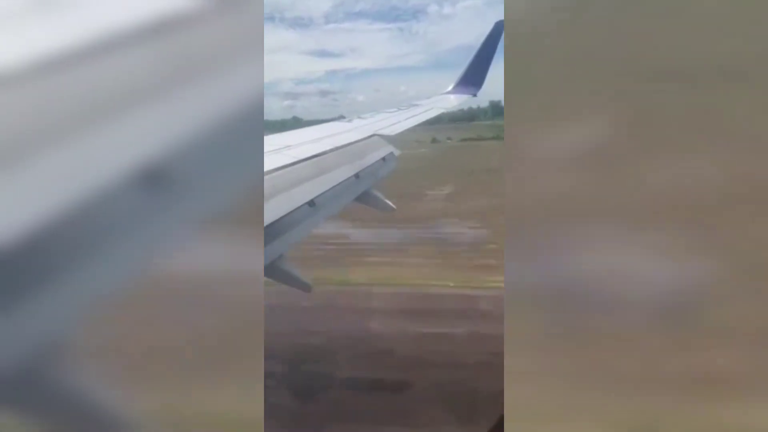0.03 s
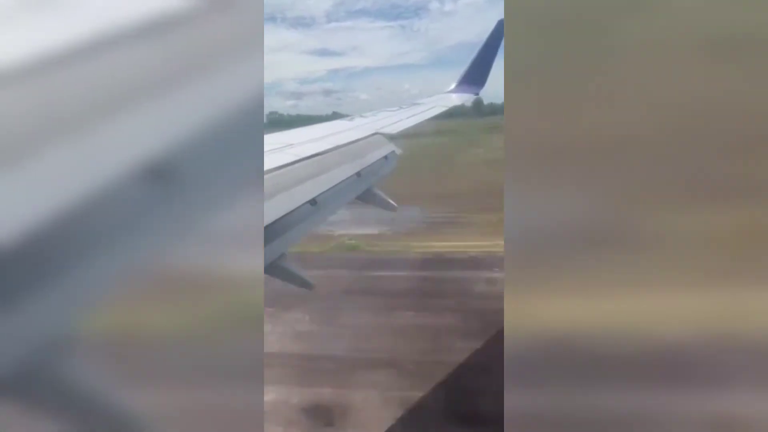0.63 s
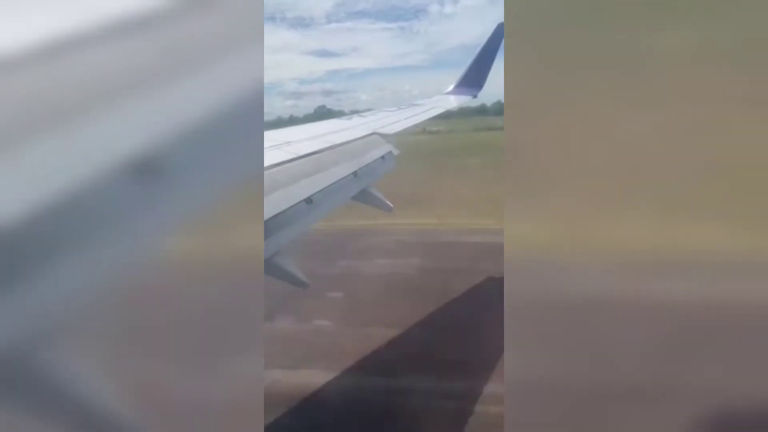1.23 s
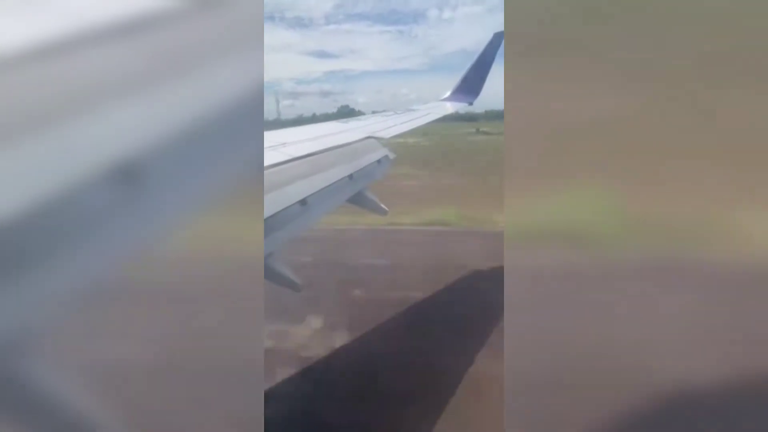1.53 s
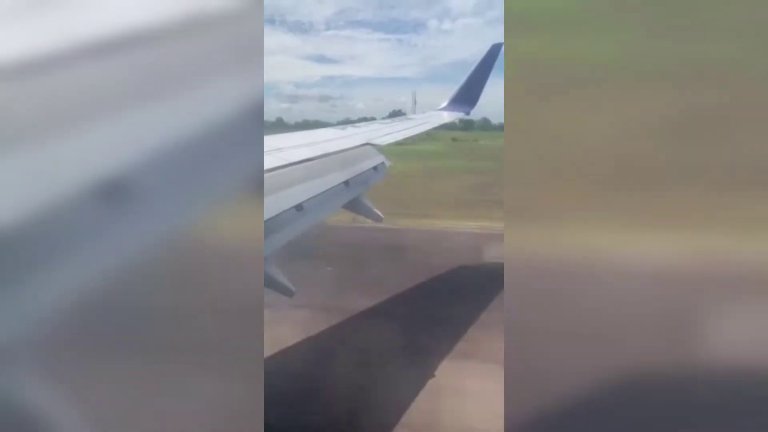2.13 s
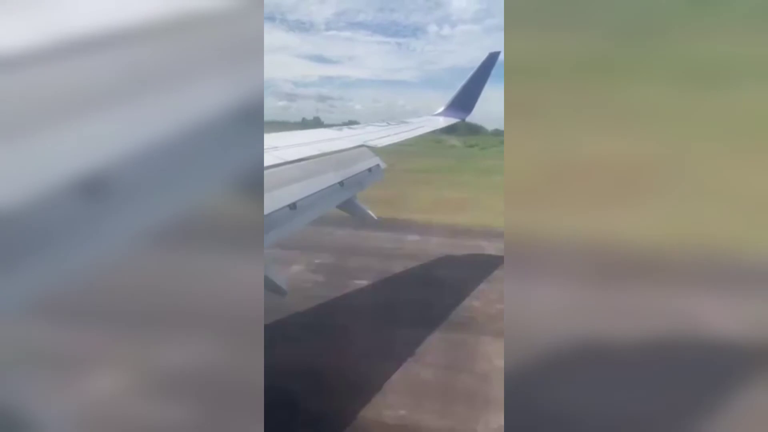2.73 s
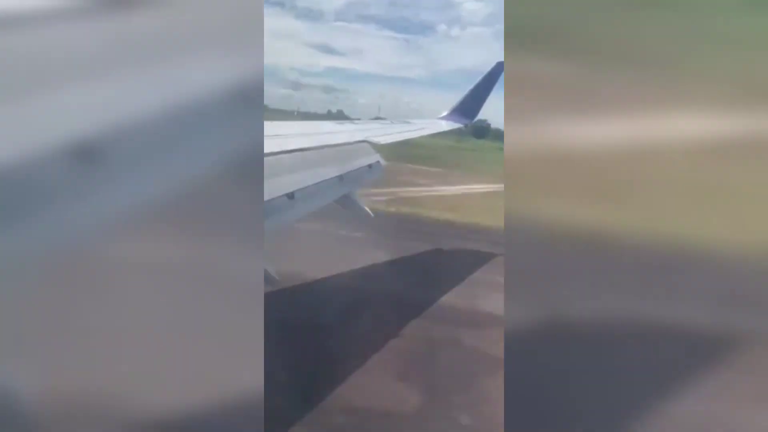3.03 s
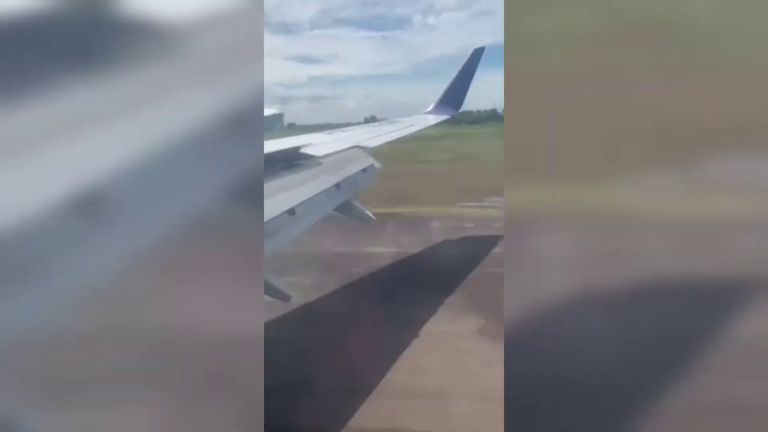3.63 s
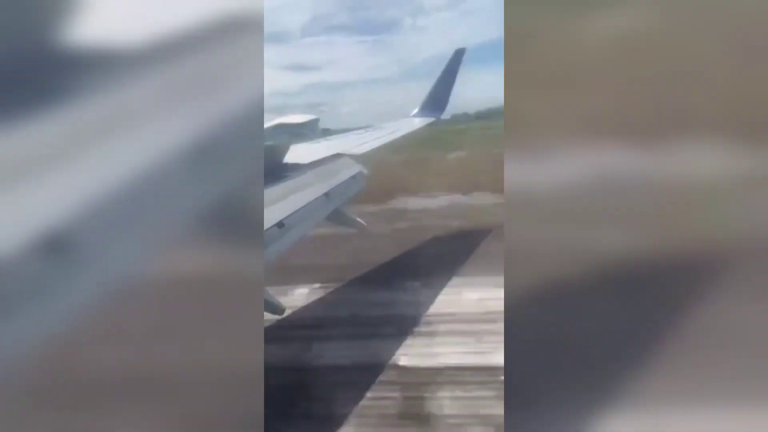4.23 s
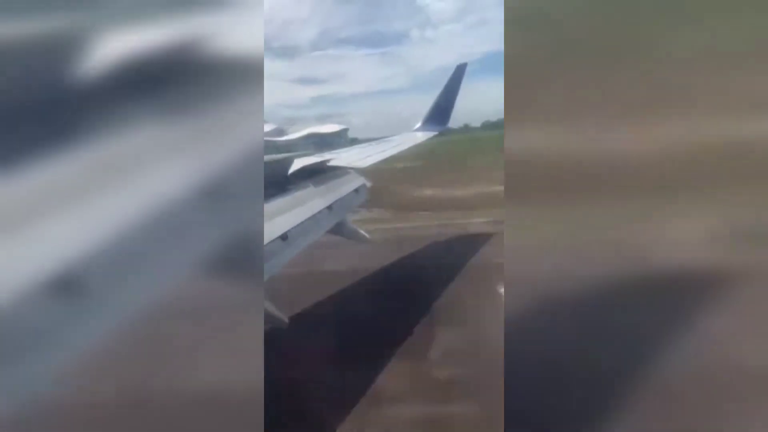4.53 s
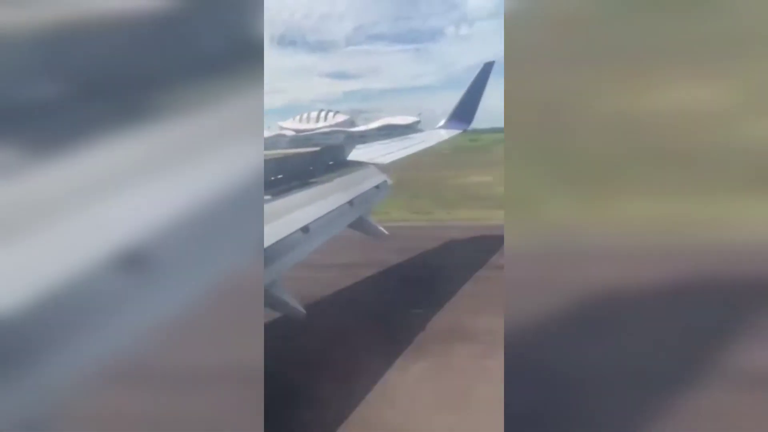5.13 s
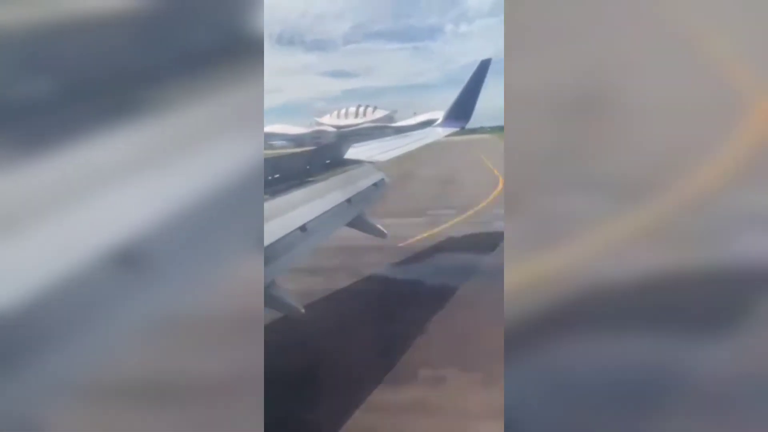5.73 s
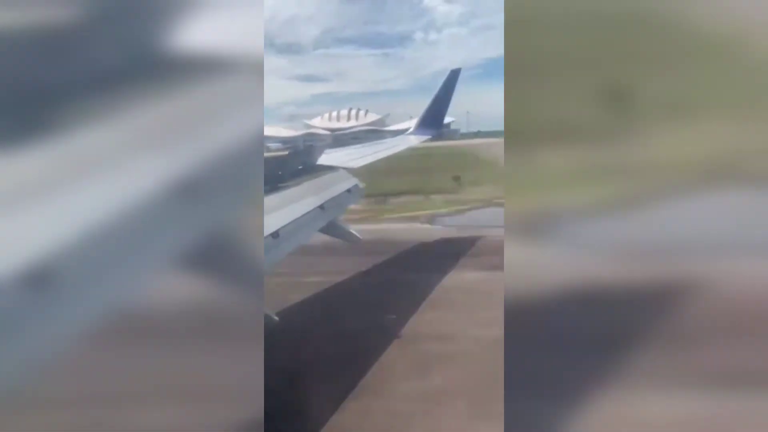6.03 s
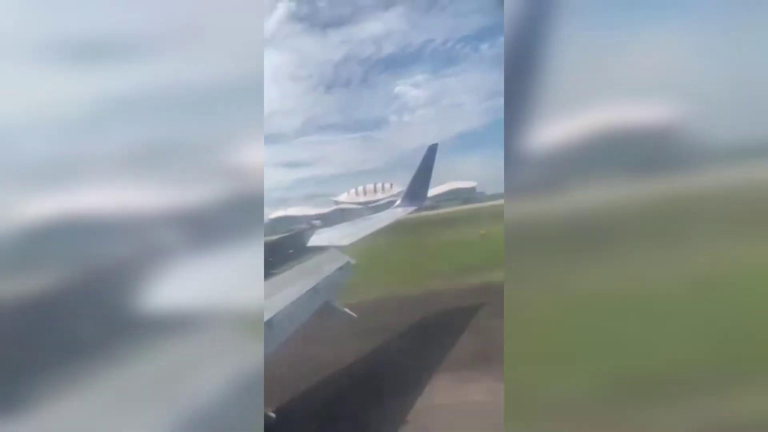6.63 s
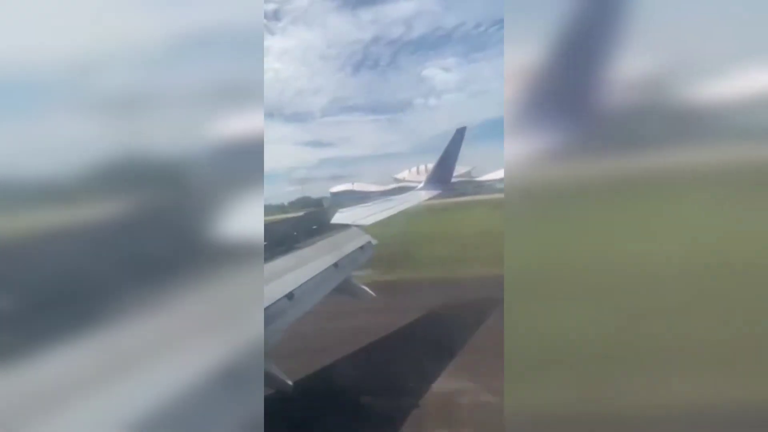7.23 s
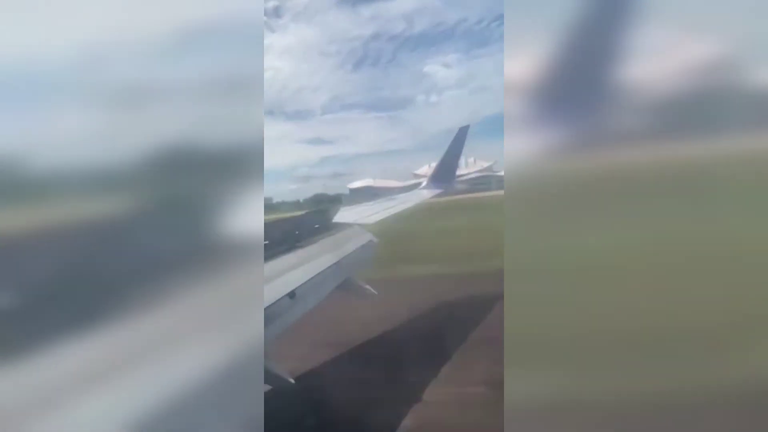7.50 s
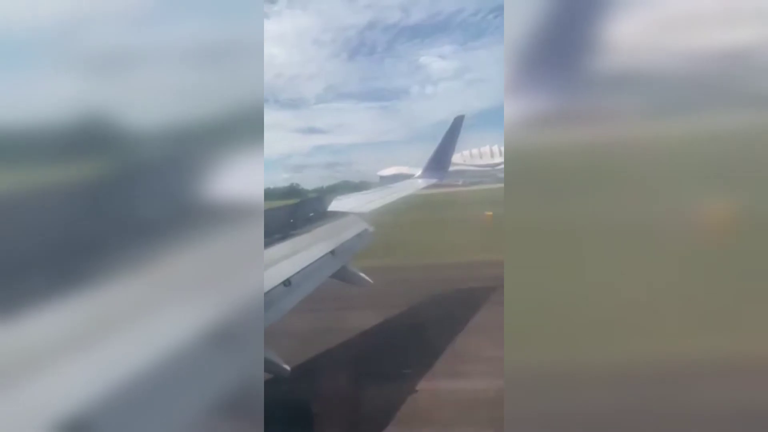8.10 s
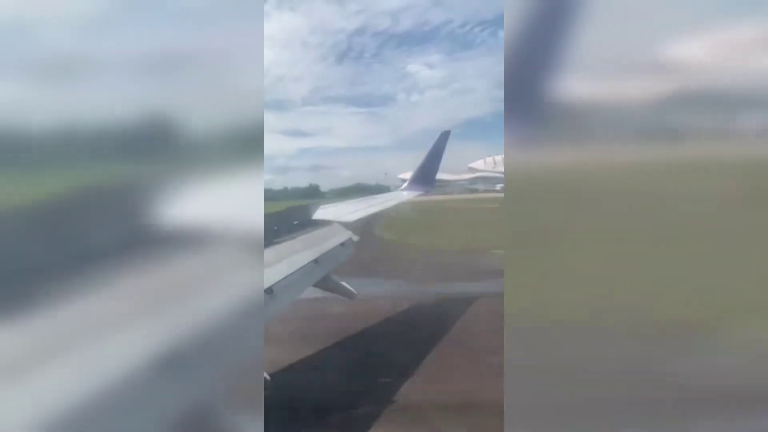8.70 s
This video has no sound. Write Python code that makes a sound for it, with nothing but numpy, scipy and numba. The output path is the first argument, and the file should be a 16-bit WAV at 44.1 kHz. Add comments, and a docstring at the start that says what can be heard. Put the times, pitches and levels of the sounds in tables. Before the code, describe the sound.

From an airliner's window seat, a deep roar of air and a low engine drone fill the cabin, with a soft hiss and a faint, wavering pump whine. Plastic trim snaps at about 1.6 seconds. At 2.8 seconds the wheels touch down with a clack, and the drone turns abruptly into a loud, booming runway rumble that lasts to the end. Wall panels, bins and trim rattle and clack in irregular jolts. A loose fitting knocks on the left near 3, 3.5, 4, 5.6 and 6.1 seconds, hardest at 3.5. Low hums swell briefly around 4.5 to 5.3 seconds, and a sharp plastic snap comes near 5.1. From 6.5 seconds a few thin squeaks appear and the engines build into a low rush of reverse thrust, strongest at the end near 9 seconds, while the rattle eases slightly. The phone holds down the loudest rumble.

```python
"""An airliner's body booms on the runway as it lands, heard from a window seat over the wing.
Before the wheels touch at 2.83 s, air roars past the wing, the engines drone and a pump whines.
Then the tyres pound the runway: wall panels, bins and plastic trim rattle, a loose fitting knocks,
and near the end the engines swell for reverse thrust. A phone's limiter holds down the loud rumble."""
import sys
import numpy as np
from scipy import signal
from scipy.fft import rfft, irfft
from scipy.io import wavfile
from scipy.ndimage import uniform_filter1d, minimum_filter1d
from numba import njit

SR = 44100
rng = np.random.default_rng(int(sys.argv[2]) if len(sys.argv) > 2 else 0)


def file_out(sig):
    """Save sig as 16-bit WAV at sys.argv[1]."""
    # one column per channel
    cols = np.atleast_2d(sig).T
    # limit, then scale
    lim = np.clip(cols, -1, 1)
    pcm = np.round(lim * 32767).astype(np.int16)
    wavfile.write(sys.argv[1], SR, pcm)


N = 395136
TIME = np.arange(N) / SR
FREQS = np.fft.rfftfreq(N, 1 / SR)
TOUCHDOWN_S = 2.83

# The boom, strongest as the weight settles. Each row: time in seconds, level in dB.
BOOM_LEVELS = [(2.84, -8), (3.02, -7), (3.3, -11), (4.3, -9.5), (4.7, -11.5), (5.5, -11.5), (5.9, -10.5),
               (6.6, -11.5), (7.45, -9.5), (7.9, -12.5), (8.3, -8), (8.6, -15.5)]
# The engine drone in the air. Each row: time in seconds, level in dB.
DRONE_LEVELS = [(0, -14.5), (.58, -11.5), (.8, -25), (1, -16.5), (1.6, -16), (2.25, -14.5), (2.8, -19)]

def fuselage(drone_hz, boom_hz, sag_hz_per_s):
    """The plane's body drones with the engines, then booms once the tyres pound the runway."""
    boom_db, = curves(BOOM_LEVELS)
    drone_db, = curves(DRONE_LEVELS)
    since_touchdown = TIME - TOUCHDOWN_S
    sagging_hz = boom_hz - sag_hz_per_s * since_touchdown  # the pitch sinks as the plane slows
    rolling = np.clip(since_touchdown / .014, 0, 1)
    drone = wandering_tone(np.full(N, drone_hz), width_hz=7.8, span_s=.18) * undb(drone_db)
    boom = wandering_tone(sagging_hz, width_hz=17.8, span_s=.075) * undb(boom_db)
    return drone * (1 - rolling) + boom * rolling


def wandering_tone(hz, width_hz, span_s):
    """One tone, pushed at random so that its swing wanders in size and timing."""
    push = signal.sosfilt(signal.butter(2, width_hz / 2, fs=SR, output="sos"),
                          rng.standard_normal((4, N)))
    tone = np.exp(2j * np.pi * np.cumsum(hz) / SR)
    swing = np.real((push[:2] + 1j * push[2:]) * tone)
    return steady(spread(swing), span_s)


# The roar rises and eases with the airflow. Each row: time in seconds, level in dB.
ROAR_LEVELS = [(0, -12), (.8, -10), (2, -10.5), (3.1, -13), (4.1, -13.5), (4.6, -9.5), (5.3, -13.5),
               (6.4, -10.5), (7.4, -14), (8, -11.5), (8.8, -10.5)]
# The tone of the roar and of the hiss. Each row: frequency in Hz, relative strength in dB.
ROAR_COLOUR = [(20, -25.5), (34, -17.5), (50, -3.5), (75, 3), (105, 0.5), (135, 0), (175, 1), (250, -4.5),
               (335, -9.5), (420, -18), (540, -32.5), (800, -58), (3000, -100)]
HISS_COLOUR = [(300, -8.5), (550, -5.5), (620, 3.5), (700, -1.5), (900, 1.5), (1150, -6), (1400, -6),
               (1850, -15), (2300, -17), (2750, -15.5), (3700, -25.5), (4250, -21.5), (5200, -29),
               (6700, -24), (8500, -43), (11000, -35)]

def airflow(hiss_db):
    """Air beats on the wing flaps with a deep roar and hisses along the plane's skin."""
    roar_db, = curves(ROAR_LEVELS)
    roar = steady(turbulence(ROAR_COLOUR, flutter_db=2.4), span_s=.12)
    hiss = turbulence(HISS_COLOUR, flutter_db=.3)
    return roar * undb(roar_db) + hiss * undb(hiss_db)


# The engines build up. Each row: time in seconds, level in dB.
THRUST_LEVELS = [(0, -59), (6.5, -26.5), (7.5, -21.5), (8.1, -19.5), (8.45, -15), (8.96, -13)]
# Their tone. Each row: frequency in Hz, relative strength in dB.
THRUST_COLOUR = [(120, -21.5), (200, 1.5), (340, 3), (450, -14.5), (600, -18.5), (1000, -34), (2000, -60.5)]

def reverse_thrust():
    """The engines swell to a low rush as they help to brake the plane."""
    thrust_db, = curves(THRUST_LEVELS)
    return turbulence(THRUST_COLOUR, flutter_db=2) * undb(thrust_db)


# Each row: start in seconds, peak level in dB, how many dB louder on the left than on the right.
FITTING_KNOCKS = [(2.9888, -9, 11), (3.5055, 1, 12), (3.9938, -2.5, 11), (5.601, -4.5, 10),
                  (6.0793, -7, 13)]

def knocks(echo_db, echo_t60_s, start_hz=1600, body_hz=355, drop_s=.00085, t60_s=.022):
    """A loose fitting hits a panel. Treble runs through it fastest, so a tick drops to a thud."""
    out, t = np.zeros((2, N)), TIME[:2048]
    hz = body_hz + (start_hz - body_hz) * np.exp(-t / drop_s)
    envelope = (1 - np.exp(-t / .0008)) * undb(-60 * t / t60_s)
    for s, db, pan_db in FITTING_KNOCKS:
        detune = 1 + .05 * rng.standard_normal()
        blow = envelope * np.sin(2 * np.pi * np.cumsum(hz * detune) / SR)
        blow = blow[None] / np.abs(blow).max() * undb(db)
        ear_gains = undb(np.minimum([[pan_db], [-pan_db]], 0))
        add(out, s, blow * ear_gains)
        add(out, s, signal.fftconvolve(blow, ring(echo_t60_s), axes=1) * undb(echo_db))
    return out


# The tone of the low rattle and of the bright rattle, which dips near 8500 Hz.
# Each row: frequency in Hz, relative strength in dB.
LOW_RATTLE_COLOUR = [(250, 14.5), (370, 14.5), (450, 9.5), (560, 1), (700, -2), (900, -3.5), (1170, -5.5),
                     (1450, -11.5), (1900, -13.5), (2700, -17), (4000, -24), (6000, -34), (10000, -35)]
BRIGHT_RATTLE_COLOUR = [(1200, 6), (2500, 5), (4000, 4), (5200, 0), (6600, 0), (8500, -13), (10500, -0.5),
                        (12000, -9.5)]

def cabin_rattle(boom):
    """From touchdown on, the runway shakes wall panels, bins and their plastic trim."""
    panel_gain, trim_gain = shaking()
    floor_phase = np.angle(signal.hilbert(boom[0]))  # where the floor is in its swing
    panels = rattle(floor_phase, LOW_RATTLE_COLOUR, low_hz=330, high_hz=6000, crunch_db=1,
                    echo_db=-5, scatter_db=2.2, t60_s=.01, bout_db=2.2, count=1700)
    trim = rattle(floor_phase, BRIGHT_RATTLE_COLOUR, low_hz=1800, high_hz=13000, crunch_db=.7,
                  echo_db=0, scatter_db=2, t60_s=.008, bout_db=3.2, count=3200)
    return panels * panel_gain + trim * trim_gain


# The light rattle between jolts. Each row: time in seconds, panel level in dB, trim level in dB.
ROLLING_LEVELS = [(2.83, -26.5, -69), (3.75, -31.5, -51), (5, -29, -45.5), (7.2, -33, -45.5),
                  (8, -38, -45.5), (8.96, -35, -48.5)]
# Bumps in the runway. Each row: start and length in seconds, panel level in dB, trim level in dB.
RUNWAY_JOLTS = [(2.815, 0.15, -25, -37.5), (2.966, 0.16, -30.5, -37.5), (3.074, 0.17, -24, -34),
                (3.257, 0.064, -37, -34), (3.38, 0.14, -26.5, -34), (3.885, 0.14, -26, -39.5),
                (4.053, 0.071, -24.5, -30.5), (4.162, 0.058, -22.5, -35.5), (4.24, 0.18, -29, -47),
                (4.364, 0.077, -24, -33.5), (4.468, 0.11, -25, -37.5), (4.594, 0.024, -25.5, -39),
                (4.769, 0.14, -29, -35), (4.907, 0.14, -23, -30.5), (5.096, 0.12, -25, -32.5),
                (5.245, 0.014, -23.5, -30.5), (5.383, 0.06, -22.5, -34.5), (5.555, 0.046, -24, -35.5),
                (5.637, 0.097, -24.5, -46), (5.74, 0.12, -29, -42), (5.99, 0.14, -25.5, -41.5),
                (6.137, 0.11, -31.5, -37), (6.297, 0.11, -29, -35), (6.365, 0.086, -23.5, -31),
                (6.5, 0.18, -36, -41), (6.633, 0.13, -28.5, -38), (6.75, 0.23, -30, -36),
                (6.97, 0.26, -45, -41), (7.202, 0.057, -28, -41.5), (7.276, .07, -28.5, -36.5),
                (7.417, 0.032, -36, -37.5), (7.6, 0.096, -35, -47), (8.19, 0.24, -34.5, -42.5),
                (8.867, .11, -30, -43)]

def shaking(attack_s=.026, settle_db_per_s=186):
    """How hard panels and trim shake: each jolt quickly adds to the light rattle, then dies away."""
    rolling = np.clip((TIME - TOUCHDOWN_S) / .008, 0, 1)
    power = undb(curves(ROLLING_LEVELS)) ** 2 * rolling
    for s, length_s, panel_db, trim_db in RUNWAY_JOLTS:
        age = TIME - s
        rise = np.clip(age / attack_s, 0, 1)
        settle = undb(-settle_db_per_s * np.clip(age - length_s, 0, 1))
        power += (undb([[panel_db], [trim_db]]) * rise * settle) ** 2
    return np.sqrt(power)


def rattle(floor_phase, tone, low_hz, high_hz, crunch_db, echo_db, **tap_settings):
    """Twenty loose parts, large to small, shake in quick crunches and blend in the cabin's echo."""
    near = sum(loose_part(hz, floor_phase, **tap_settings) for hz in np.geomspace(low_hz, high_hz, 20))
    near = near * undb(crunch_db * walk(170))
    echo = cabin_echo(near, t60_s=.2)
    blend = unit(near) + unit(echo) * undb(echo_db)
    return steady(spread(colour(blend, tone)), span_s=.06)


def loose_part(hz, floor_phase, scatter_db, t60_s, bout_db, count):
    """One part taps in bouts, hardest at its own moment of the floor's swing."""
    starts = rng.integers(int(2.8 * SR), N, count)
    bouts = np.interp(starts / N, np.linspace(0, 1, 260), rng.standard_normal(260))
    throw = 1 + .5 * np.cos(floor_phase[starts] + rng.uniform(0, 2 * np.pi))
    accents = np.minimum(rng.exponential(size=count), np.pi)
    size = np.sqrt(hz) * throw * undb(scatter_db * accents + bout_db * bouts)
    pitch = hz * np.exp(.13 * rng.standard_normal(count))
    left, right = size * np.exp(2j * np.pi * rng.random((2, count)))
    decay_s = t60_s * 2 ** rng.uniform(-1, 2, count)
    return taps(starts, np.minimum(pitch, SR / 3), decay_s, left, right)


@njit
def taps(start, hz, t60_s, left, right):
    """Tiny fading rings with a soft start; left and right hold each one's size and phase."""
    out = np.zeros((2, N))
    for k in range(len(start)):
        turn_and_fade = np.exp((2j * np.pi * hz[k] - np.log(1000) / t60_s[k]) / SR)
        swing, onset = 1 + 0j, 0.
        for i in range(start[k], min(N, start[k] + int(t60_s[k] * SR * .7))):
            onset += (1 - onset) * hz[k] / SR * .5
            swing *= turn_and_fade
            out[0, i] += onset * (swing * left[k]).imag
            out[1, i] += onset * (swing * right[k]).imag
    return out


def cabin_echo(x, t60_s):
    """Each moment's clatter comes from another place in the cabin, so it gets its own echo."""
    out, block = np.zeros((2, N)), SR // 50
    for i in range(int(TOUCHDOWN_S * SR) - block, N - block, block):
        add(out, i / SR, signal.fftconvolve(x[:, i:i + block], ring(t60_s), axes=1))
    return out


# Each row: start in seconds, opening level in dB, centre frequency in Hz.
PANEL_CLACKS = [(2.843, -23.5, 750), (2.888, -27.5, 2600), (3.05, -29.5, 900), (3.193, -27, 750),
                (3.237, -24, 900), (3.335, -29.5, 900), (4.499, -31, 2300), (4.6, -31, 1400),
                (4.638, -30, 1000), (4.786, -24, 1200), (4.927, -26, 1000), (4.997, -27, 1500),
                (5.06, -30, 2200), (5.155, -27, 1200), (5.432, -32, 2200), (5.676, -29, 2200),
                (6.025, -33, 3600), (6.189, -24, 1250), (6.318, -28, 950), (6.388, -25, 1000),
                (6.405, -26, 950), (6.9, -31.5, 1000), (7.445, -39, 2800), (8.308, -34, 2400)]

def clacks(t60_s):
    """A panel or bin door hits its frame: a dry burst with no clear pitch."""
    out = np.zeros((2, N))
    for s, db, hz in PANEL_CLACKS:
        band = signal.butter(2, [hz / 1.7, hz * 1.7], "bandpass", fs=SR, output="sos")
        burst = signal.sosfilt(band, crunch(t60_s))
        opening_level = burst[:, :SR // 80].std()
        add(out, s, burst / opening_level * undb(db))
    return out


# Each row: start in seconds, level in dB before filtering, fade time in seconds.
TRIM_SNAPS = [(1.575, -31, .06), (1.589, -14.5, .028), (1.6, -25.5, .09), (2.843, -19, .05),
              (4.088, -17, .07), (5.148, -6.5, .04), (5.271, -15.5, .05), (8.313, -20, .05)]

def snaps():
    """The plastic trim snaps in single bright crunches."""
    out = np.zeros((2, N))
    for s, db, t60_s in TRIM_SNAPS:
        add(out, s, crunch(t60_s) * undb(db))
    return colour(out, [(600, -22), (1800, -1), (2800, .5), (4500, -3), (8000, -5.5), (12000, -2.5)])


# Each row: loudest moment in seconds, half length in seconds, pitch in Hz, top level in dB.
TONE_SWELLS = [(0.523, 0.15, 2650, -54), (0.857, .13, 2750, -59), (1.105, 0.22, 2640, -62),
               (1.5, 0.06, 900, -34.5), (2.37, .07, 2665, -51), (4.55, 0.44, 144, -14.5),
               (5.163, 0.35, 161.3, -17), (6.73, 0.15, 177.3, -21)]

def swells(width_hz):
    """Brief tones swell and fade: low hums, and faint high tones beside the pump's whine."""
    out = np.zeros((2, N))
    for s, half_s, hz, db in TONE_SWELLS:
        envelope = np.exp(-((TIME - s) / half_s) ** 2)
        out += wandering_tone(np.full(N, hz), width_hz, span_s=.12) * undb(db) * envelope
    return out


# Each row: start in seconds, peak level in dB, pitch in Hz.
JOINT_CHIRPS = [(6.451, -29, 4120), (7.547, -34, 6200), (8.243, -37, 6200), (8.741, -37, 6260),
                (8.851, -41.5, 6200), (8.921, -40, 6340)]

def chirps(rise_s, roughness):
    """A tight joint slips for a moment and gives a thin, rough squeak."""
    out, t = np.zeros((2, N)), TIME[:2048]
    envelope = t / rise_s * np.exp(1 - t / rise_s)
    for s, db, hz in JOINT_CHIRPS:
        jitter = roughness * np.cumsum(rng.standard_normal((2, len(t))), axis=1)
        add(out, s, np.sin(2 * np.pi * hz * t + jitter) * envelope * undb(db))
    return out


# The notes a latch rings with. Each row: pitch in Hz, level in dB, fade time in seconds.
LATCH_NOTES = [(2326, -36.5, .05), (2470, -38.5, .08), (2536, -36, .11)]

def latch(start_s):
    """A small latch ticks once and rings briefly."""
    out, t = np.zeros((2, N)), TIME[:8192]
    onset = 1 - np.exp(-t / .004)
    for hz, db, t60_s in LATCH_NOTES:
        phase = 2 * np.pi * hz * t + rng.uniform(0, np.pi / 2, (2, 1))
        add(out, start_s, np.sin(phase) * onset * undb(db - 60 * t / t60_s))
    return out


# How the pump runs. Each row: time in seconds, piston strokes per second, level in dB.
PUMP_RUN = [(0, 572.4, -54), (1.1, 573, -55), (2.7, 571.6, -62), (3.6, 572, -58.5), (4.6, 571.8, -54.5),
            (6, 571.5, -62), (8.96, 571, -68)]
# Its overtones. Each row: multiple of the stroke rate, dB added to the pump's level.
PUMP_OVERTONES = [(2, 1.5), (3, -8.5), (4, -9), (5, 3.3)]

def pump(waver_db=2.2, flutter_db=2):
    """The pistons of a hydraulic pump whine, wavering slowly and fluttering quickly."""
    out = np.zeros((2, N))
    hz, db = curves(PUMP_RUN)
    phase = 2 * np.pi * np.cumsum(hz + .8 * walk(14) + .7 * walk(90)) / SR
    for ear in out:
        for multiple, overtone_db in PUMP_OVERTONES:
            gain = undb(overtone_db + waver_db * walk(2.8) + flutter_db * walk(45))
            ear += gain * np.sin(multiple * phase + rng.uniform(0, np.pi / 2))
    return np.sqrt(2) * out * undb(db)


# Thin tones of the engine blades and beside the pump's whine. Each row: pitch in Hz, level in dB.
THIN_TONES = [(2345, -66), (2680, -65), (2800, -65), (3228, -69.5), (3452, -70.5), (4009, -69.5),
              (4151, -69.5), (4199, -67), (4755, -83)]

def thin_tones(waver_hz, waver_db=4.9):
    """Thin, wavering tones: the spinning blades of the idling engines, and faint tones beside the pump's whine."""
    out = np.zeros((2, N))
    for ear in out:
        for hz, db in THIN_TONES:
            gain = undb(db + waver_db * walk(4))
            ear += gain * np.sin(2 * np.pi * np.cumsum(hz + waver_hz * walk(11)) / SR)
    return np.sqrt(2) * out


# Stereo width and lean by pitch; the highest treble narrows toward the centre.
# Each row: frequency in Hz, width in dB, lean to the left in dB.
STEREO_SHAPE = [(60, -22, -0.3), (200, -21.5, 0), (354, -13, 0.6), (597, 3, 2.5), (1140, -2.5, 2),
                (2070, 3, 0), (4000, -2, -0.5), (7500, 2.5, -1), (10500, -5, 0)]

def spread(pair):
    """Mix two unrelated signals to left and right: bass is shared, higher sounds are wider."""
    mid, side = rfft(pair)
    side = side * response(STEREO_SHAPE, column=1)
    lean = np.sqrt(response(STEREO_SHAPE, column=2))
    return irfft(np.array([(mid + side) * lean, (mid - side) / lean]), N)


def turbulence(tone, flutter_db):
    """Swirling air: stereo noise that flutters in level."""
    flow = spread(colour(rng.standard_normal((2, N)), tone))
    return unit(flow * undb(flutter_db * walk(23)))


def ring(t60_s):
    """Many panel notes at once, as a burst of noise. The fade time t60_s is for a drop of 60 dB."""
    return rng.standard_normal((2, 4096)) * undb(-60 * TIME[:4096] / t60_s)


def crunch(t60_s):
    """A panel's ring with a softened start."""
    return ring(t60_s) * (1 - np.exp(-TIME[:4096] / .003))


def undb(db):
    """Turn decibels into a gain."""
    return 10 ** (np.asarray(db) / 20)


def unit(x):
    """Scale to an average (rms) level of 1."""
    return x / np.sqrt(np.mean(x ** 2))


def steady(x, span_s):
    """Hold the level near 1 over each span_s: quick flutter stays, slow swells go."""
    power = np.mean(x ** 2, axis=0)
    return x / np.sqrt(uniform_filter1d(power, int(span_s * SR)) + 1e-12)


def curves(table):
    """Join a time table's rows with straight lines, one curve per column."""
    s, *columns = np.transpose(table)
    return [np.interp(TIME, s, c) for c in columns]


def response(table, column=1):
    """The gain at every frequency, from one dB column of a table."""
    points = np.transpose(table)
    return undb(np.interp(np.log(FREQS + 1), np.log(points[0]), points[column]))


def colour(x, table):
    """Shape a sound's tone with rows of frequency in Hz and gain in dB."""
    return irfft(rfft(x) * response(table), N)


def walk(rate):
    """A smooth random drift, about 1 in size, with rate steps a second."""
    k = int(SR / rate)
    steps = rng.standard_normal(N // 64)[np.arange(N) // k]
    return 1.3 * uniform_filter1d(uniform_filter1d(steps, k), k)


def add(out, s, sound):
    """Mix a stereo sound in at s seconds."""
    i = int(s * SR)
    out[:, i:i + sound.shape[1]] += sound[:, :N - i]


def scene():
    """Everything that reaches the seat."""
    boom = fuselage(drone_hz=50.2, boom_hz=59.97, sag_hz_per_s=.501)
    roar = airflow(hiss_db=-36) + reverse_thrust() + swells(width_hz=14.5)
    whines = pump() + thin_tones(waver_hz=11)
    blows = knocks(echo_db=-42, echo_t60_s=.1)
    clicks = clacks(t60_s=.14) + snaps() + chirps(rise_s=.0053, roughness=.23)
    return boom + roar + blows + cabin_rattle(boom) + clicks + whines


def record(dry, drive_db=.9, ceiling=.86, hold_s=.0039, top_hz=11900):
    """The phone's limiter turns down just ahead of each big swing; the highest treble is cut off."""
    edge_fade = np.minimum(np.minimum(TIME, TIME[::-1]) / .002, 1)
    x = dry * undb(drive_db) * edge_fade
    hold = int(hold_s * SR)
    gain = minimum_filter1d(np.minimum(1, ceiling / (np.abs(x) + 1e-9)), hold)
    gain = uniform_filter1d(uniform_filter1d(gain, hold // 2), hold // 2)
    return signal.sosfilt(signal.ellip(10, .2, 80, top_hz, fs=SR, output="sos"), x * gain)


dry = scene()
out = record(dry)
file_out(out)
```